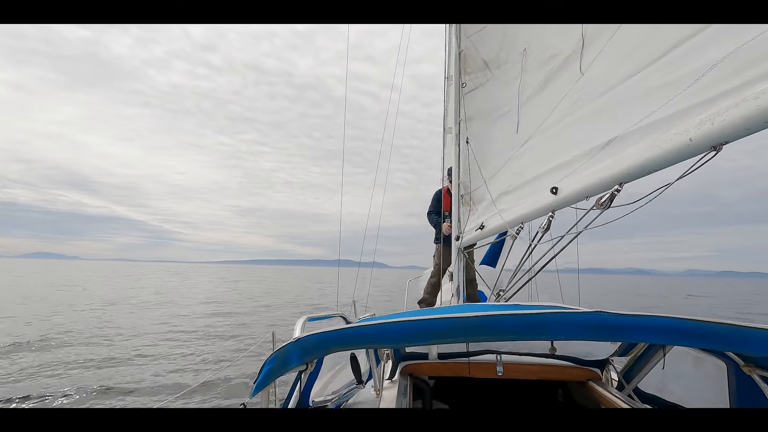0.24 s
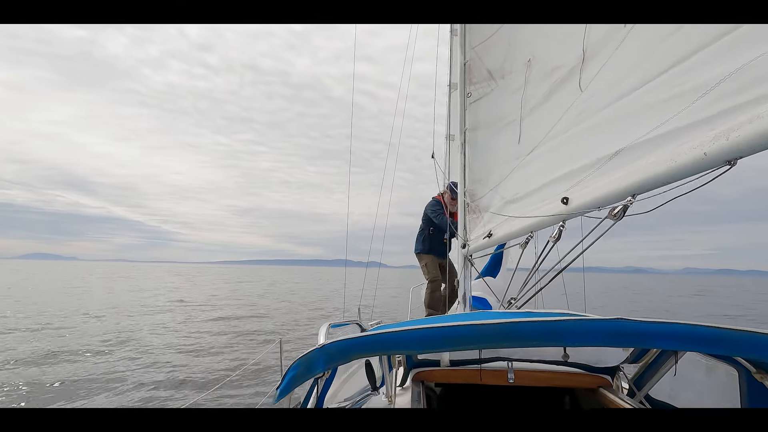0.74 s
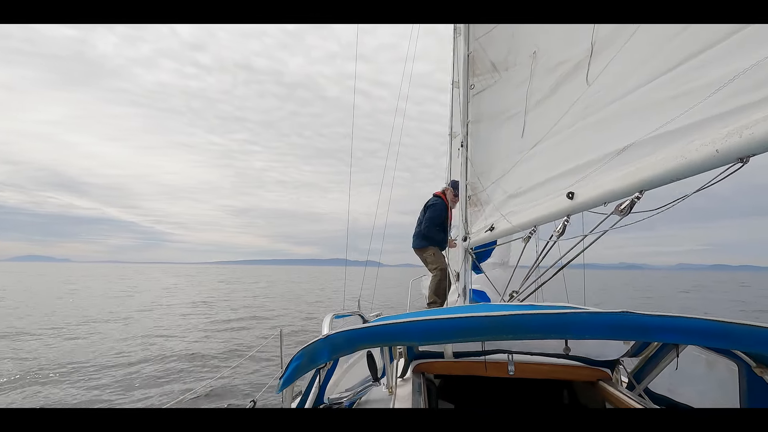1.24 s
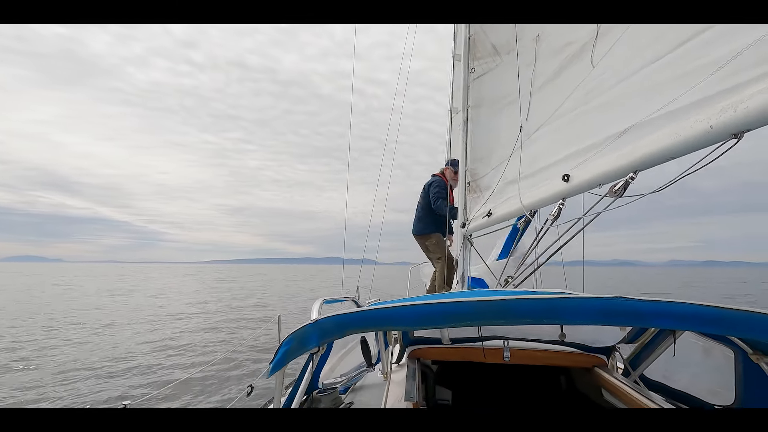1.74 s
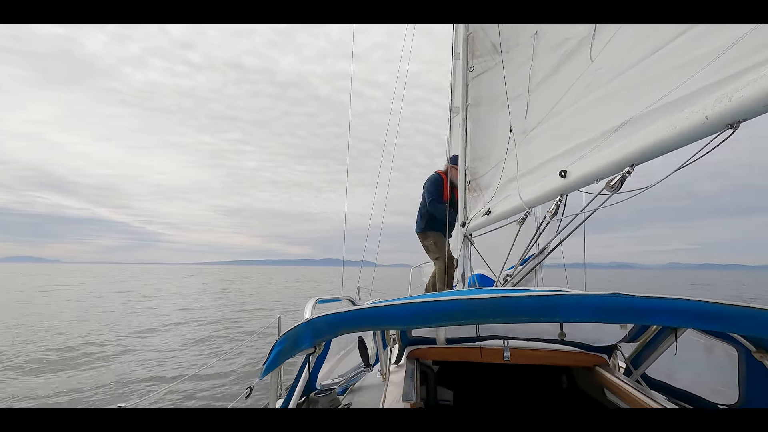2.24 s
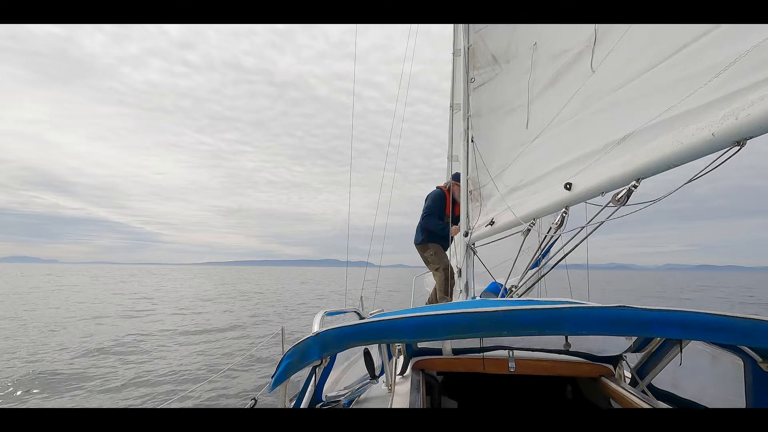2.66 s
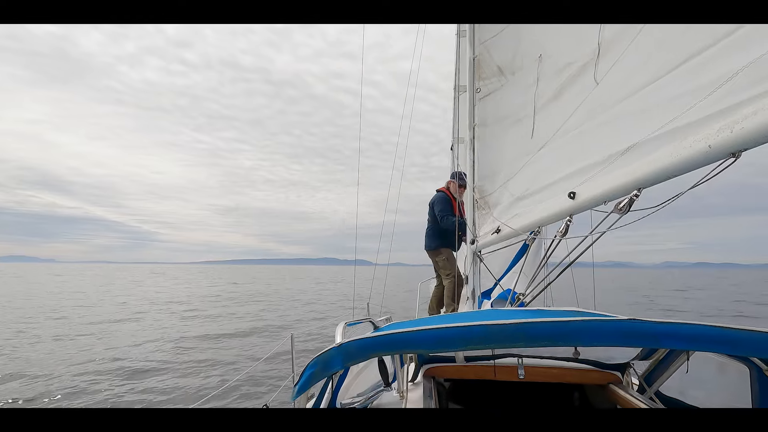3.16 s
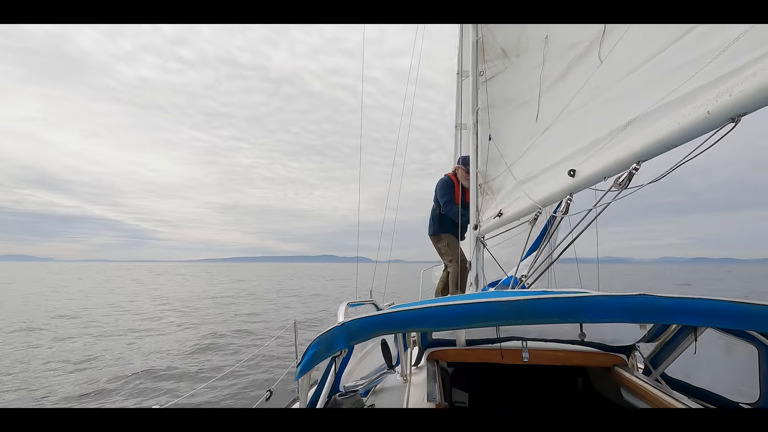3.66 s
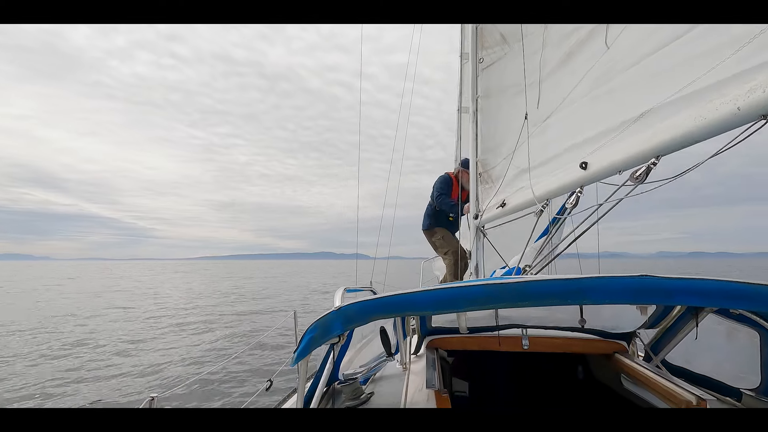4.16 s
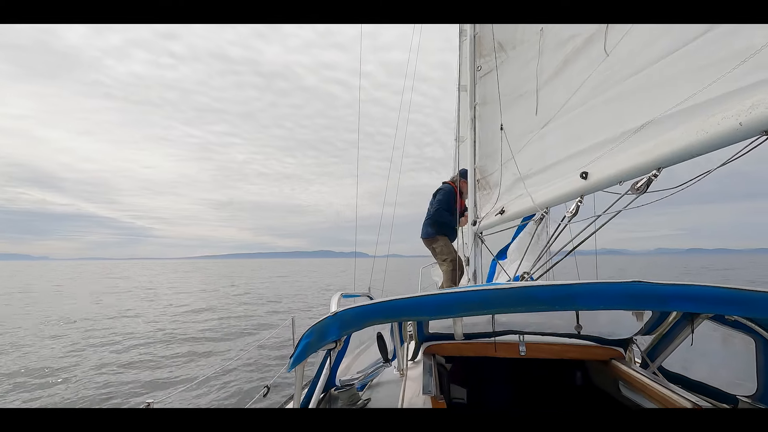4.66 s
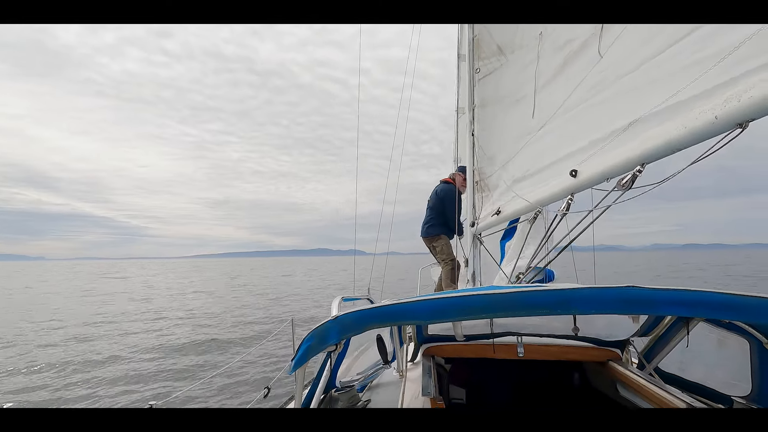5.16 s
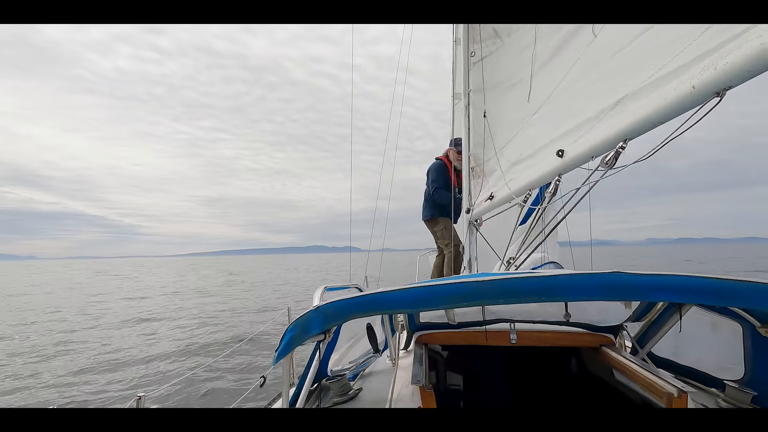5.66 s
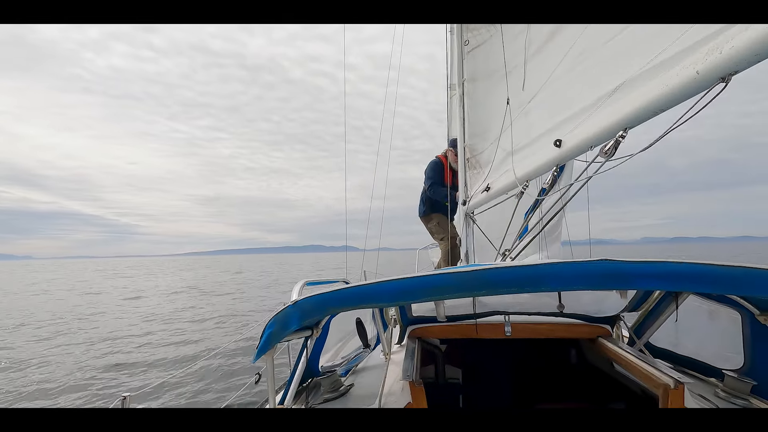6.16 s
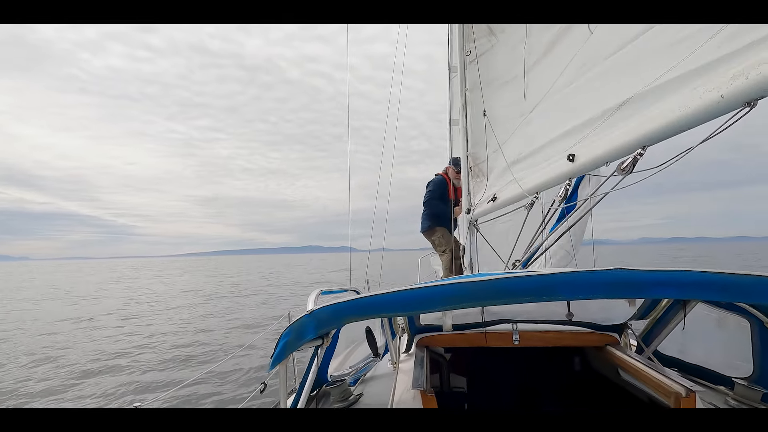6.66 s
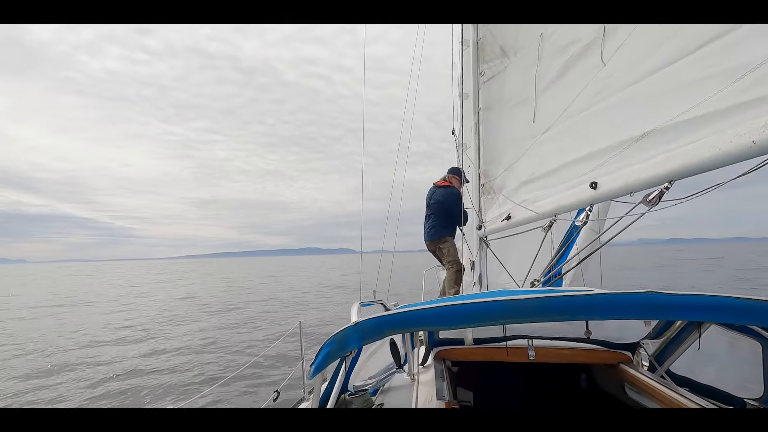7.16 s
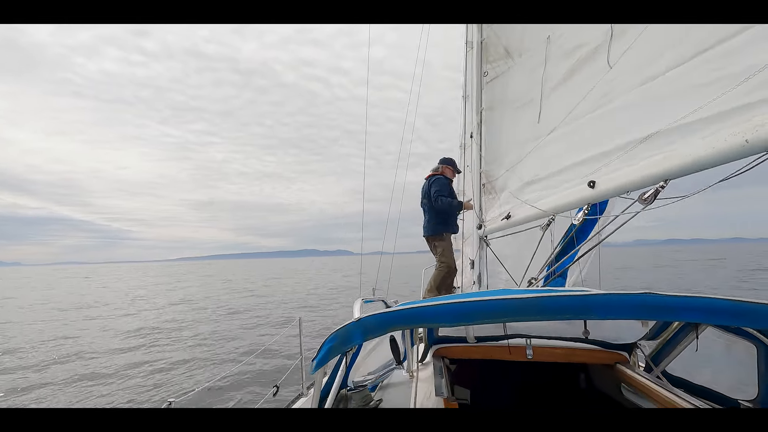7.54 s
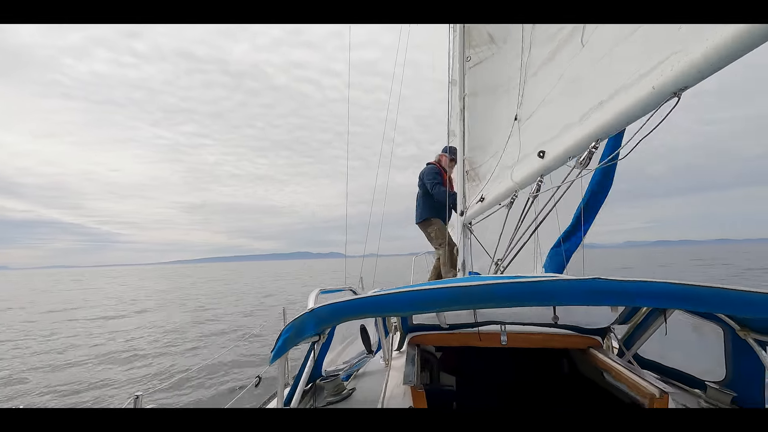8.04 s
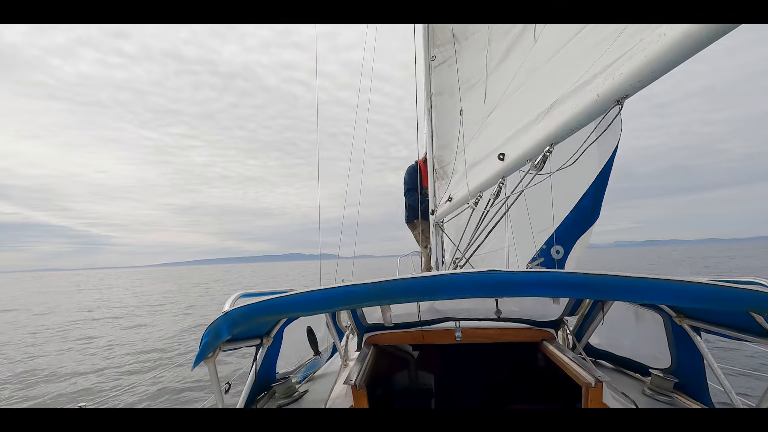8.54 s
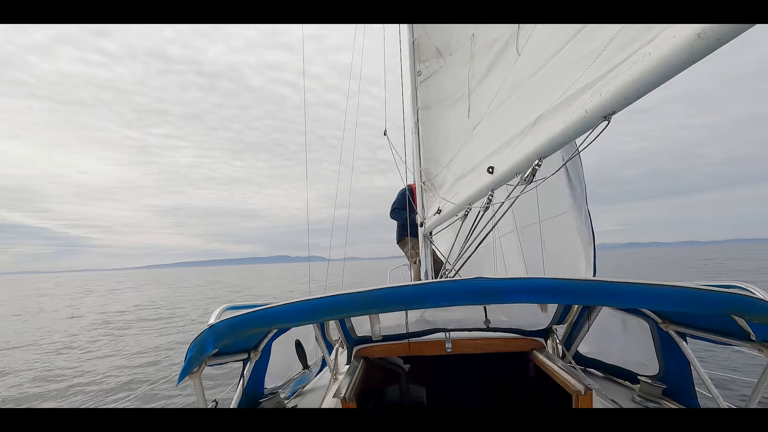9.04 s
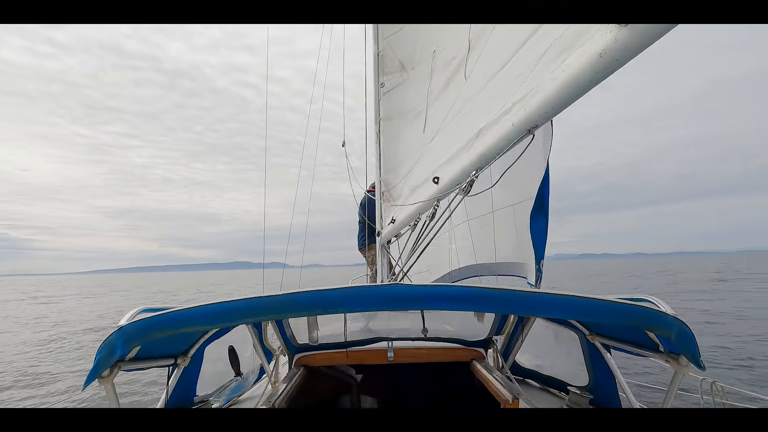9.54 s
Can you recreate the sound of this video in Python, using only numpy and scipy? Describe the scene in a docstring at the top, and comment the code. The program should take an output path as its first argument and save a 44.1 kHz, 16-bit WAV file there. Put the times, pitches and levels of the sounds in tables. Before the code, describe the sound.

On a sailboat deck, a winch at the mast is spun five times. Each haul begins with separate metallic clicks, speeds into a ringing ratchet whirr with rope rubbing over the drum, then stops quickly. Between hauls sailcloth and water rustle softly, small fittings snap and hollow knocks sound. Low wind and water rumble and a faint hull hum continue underneath. Close, dry, nearly centred pickup.

```python
"""A winch at the mast of a sailboat is spun five times: struck drum modes and scattered ticks make the pawl
clicks, slow at first, then blurred into a whirr of filtered grainy noise as a line is hauled in. Between hauls,
cloth and water rustle in clumps of noise grains; struck resonances snap, knock and ping. Filtered noise rumbles
like wind and water under wandering hum tones, and the hull bumps deeply."""
import sys
import numpy as np
from scipy import signal
from scipy.io import wavfile
from scipy.ndimage import uniform_filter1d

SR = 44100
rng = np.random.default_rng(int(sys.argv[2]) if len(sys.argv) > 2 else 0)


def generate_wav(sig):
    """Save sig (samples, or channels by samples) to the path in sys.argv[1] as 16-bit PCM at SR."""
    pcm = np.round(np.clip(np.atleast_2d(sig).T, -1, 1) * 32767).astype(np.int16)
    wavfile.write(sys.argv[1], SR, pcm)


N = 432621

# Levels in the tables are relative dB, trimmed where each layer is mixed.
# One curve a haul. Each row: time in seconds, pawl level in dB, rope-over-drum level in dB, gear whirr in dB.
HAUL_CURVES = [
    [(0.89, -53, -43, -47.5), (1.004, -43, -38, -41), (1.096, -40, -31, -36.5), (1.358, -40, -33, -35),
     (1.442, -44, -34, -37), (1.52, -45, -29, -36), (1.608, -53, -39.5, -46.5), (1.68, -93, -46.5, -68),
     (1.7, -83, -43, -62)],
    [(2.64, -50, -39.5, -45.5), (2.676, -45.5, -39.5, -40), (2.822, -40, -33.5, -34.5),
     (2.968, -40, -34, -32.5), (3.018, -39, -32.5, -34.5), (3.238, -57, -42, -48.5), (3.26, -73, -44, -52),
     (3.278, -73.5, -62, -51), (3.36, -80, -50, -67)],
    [(4.18, -52, -47, -46), (4.222, -51, -45, -43.5), (4.308, -44, -36.5, -38), (4.574, -43, -37, -38),
     (4.584, -43, -33.5, -41), (4.678, -40, -33, -35.5), (5.064, -39, -33, -30.5), (5.19, -46, -36, -38.5),
     (5.28, -74.5, -44, -60)],
    [(6.44, -47.5, -42, -44), (6.632, -42, -34.5, -33), (6.752, -39, -31.5, -32), (7.086, -39, -31, -31),
     (7.19, -40, -35.5, -34.5), (7.244, -43.5, -35.5, -39), (7.338, -54, -41.5, -49),
     (7.378, -60, -61, -54), (7.42, -54, -49, -65)],
    [(8.95, -52.5, -38.5, -49), (8.994, -45.5, -37.5, -38), (9.188, -41, -31, -32.5),
     (9.256, -36, -26.5, -31), (9.274, -39, -30.5, -28.5), (9.578, -41, -31.5, -32),
     (9.63, -45.5, -35, -39.5), (9.662, -48, -40.5, -38), (9.76, -67.5, -36, -58)],
]
# Ringing of the drum, one curve a haul. Each row: time in seconds, main ring in dB, lowest ring in dB.
RING_CURVES = [
    [(0.89, -57, -61), (0.93, -44, -57), (1.096, -44, -37), (1.19, -43, -41), (1.21, -39, -47),
     (1.238, -45, -34.5), (1.282, -36.5, -43), (1.322, -52, -32), (1.348, -38, -31), (1.396, -39.5, -52),
     (1.568, -49, -49), (1.64, -65, -65), (1.68, -91, -85)],
    [(2.64, -47, -51), (2.656, -45, -53), (2.734, -45, -48), (2.764, -48, -54), (2.816, -45, -44),
     (2.858, -53, -37), (2.886, -48, -41), (2.998, -51, -39), (3.018, -49, -54), (3.136, -41.5, -49),
     (3.222, -60, -60), (3.254, -70, -56), (3.3, -77, -69)],
    [(4.18, -51, -59), (4.198, -51, -53), (4.308, -48, -58), (4.368, -41.5, -46), (4.526, -60, -42),
     (4.598, -48, -55), (4.678, -50, -48), (4.742, -53, -44), (4.788, -40, -44), (4.85, -54, -40),
     (5.09, -48, -40), (5.234, -52, -53), (5.28, -77, -69)],
    [(6.44, -51, -54), (6.706, -46, -44), (6.736, -51, -37), (6.87, -36.5, -33), (6.914, -40, -35),
     (6.958, -52, -32), (6.974, -48, -35), (7.028, -40, -32.5), (7.156, -46, -38), (7.188, -39.5, -44),
     (7.278, -46, -46), (7.318, -60, -58), (7.4, -68, -64)],
    [(8.95, -50, -52), (9.062, -47, -54), (9.116, -41, -43), (9.22, -43, -42), (9.24, -35, -33),
     (9.292, -43, -38), (9.378, -35, -34), (9.418, -41, -37), (9.524, -37, -38), (9.54, -43, -43),
     (9.59, -37, -46), (9.708, -46.5, -53), (9.76, -68, -61)],
]
# Character of each haul. Each row: dark share of the whirr in dB; rope groan over the pawls at start and end
# in dB; drive of the modes that wake under load in dB; drive of the second ring in dB; rope drone over the
# pawls in dB; extra lowest ring of the first and last single clicks in dB; extra main ring of the same in dB.
HAUL_LOADS = [(-7, -43, -2, -16, -8, 7, -3, 1, -4, -4), (-5, -13, -4, -11, 5, -14, 0.5, -5, -3, -8),
              (-4.5, -19, -4.5, -5, 9.5, -5.5, -3, 4, -4.5, -5),
              (-2.5, -8, -5, 1, 9.5, -5.5, 0.5, -8, -6, -10), (-4, -30, 13, 9, -15, -4, 2, -3, -4.5, -3)]
# Slow single pawl clicks as the drum starts and stops. Each row: time in seconds, strength in dB.
SINGLE_CLICKS = [(0.7712, -39), (0.8265, -37.5), (0.8667, -38), (0.8925, -35), (0.9098, -36), (0.925, -34),
                 (0.9452, -34), (0.961, -34), (0.9774, -29), (1.558, -30.5), (1.585, -35), (1.61, -42),
                 (2.51, -36.5), (2.5334, -37), (2.551, -35), (2.5716, -39), (2.599, -37), (2.6174, -35.5),
                 (2.634, -33), (2.652, -32), (2.671, -31), (2.687, -28.5), (3.165, -31), (3.186, -34.5),
                 (3.215, -37), (3.233, -49), (3.255, -46), (4.087, -41), (4.127, -35), (4.152, -37),
                 (4.1768, -35), (4.192, -36), (4.21, -34), (4.222, -38), (4.2363, -37), (4.249, -36),
                 (4.261, -33), (4.272, -37), (4.282, -30.5), (4.2926, -33), (4.3021, -35), (4.3111, -34),
                 (6.358, -37.5), (6.381, -35.5), (6.411, -35.5), (6.431, -31), (6.451, -37), (6.4622, -31),
                 (6.476, -35), (6.486, -30), (6.499, -34), (6.509, -30), (7.308, -34), (7.34, -39),
                 (8.906, -38.5), (8.9196, -43), (8.943, -35.5), (8.958, -34), (8.972, -35), (8.9828, -34),
                 (8.997, -30.5), (9.005, -34)]
# Drive of a single click in dB, one value for each kind of strike, in the order of the drum modes' kinds.
SINGLE_CLICK_DRIVE = [14.2, 20.8, 23.6, 16, 11, 16]
# Modes of the winch drum. Each row: pitch in Hz, nominal width in Hz, level in dB, left over right in dB,
# part that differs between the ears in dB, kind of strike that drives it
# (0 plain, 1 lowest ring, 2 main ring, 3 shrill, 4 under load, 5 second ring).
DRUM_MODES = [(2200, 60, -12, 0, -80, 4), (2445, 50, -2, 0, -80, 4), (2535, 50, -6, 0, -80, 4),
              (2790, 110, -5, 0, -80, 1), (2700, 90, -14, 0, -80, 1), (2865, 120, -13, 0, -80, 1),
              (3140, 55, -11, 0, -80, 4), (3520, 60, -10, 0, -80, 4), (3805, 70, -10, 0, -80, 4),
              (6350, 150, -15, 0, -80, 0), (3010, 60, -9, 0, -80, 5), (3445, 70, -4, 0, -80, 0),
              (3940, 60, -13, 0, -80, 0), (4745, 90, -5, 0, -80, 2), (4772, 70, -3, 0, -80, 2),
              (5480, 45, -10, 0, -80, 0), (5600, 160, -14, 0, -80, 0), (6660, 260, -16, 0, -80, 0),
              (7165, 40, -13, 0, -80, 0), (7960, 50, -18, 0, -80, 3), (9160, 300, -27, 0, -80, 3),
              (10300, 900, -35, 0, -80, 3), (11535, 65, -19, 4, -8, 3), (11805, 80, -17, 4, -7, 3),
              (12210, 80, -25, 4, -4, 3), (12470, 70, -25, 4, -4, 3), (12900, 130, -31, 4, -4, 3)]
# Colour of the bare click. Each row: frequency in Hz, gain in dB.
TICK_COLOUR = [(880, -19), (1500, -35), (2470, -18), (2830, -4), (4430, -9.5), (4700, -9.5), (6680, -5.5),
               (8350, -25), (9770, -24.5), (11000, -31), (11400, -20), (12000, -15), (15400, -60)]
# Colour of the gear whirr. Each row: frequency in Hz, density in dB per Hz.
WHIRR_COLOUR = [(880, -27), (1500, -29.5), (2460, -3), (2840, 1), (3310, -0.5), (4050, -2), (4420, -6),
                (4690, -5), (6690, -10.5), (8500, -22.5), (11000, -45), (18700, -120)]
# Colour of the rope rushing over the drum. Each row: frequency in Hz, density in dB per Hz.
RUSH_COLOUR = [(140, -54.5), (240, -2), (364, -3), (510, 5.5), (561, -3), (606, -2.5), (727, -10.5),
               (835, -5.5), (1650, -18), (1900, -22.5), (2470, -24), (4180, -120)]
# One curve a rest between hauls. Each row: time in seconds, dull rustle in dB, bright rustle in dB.
REST_CURVES = [
    [(0.0, -47, -53), (0.44, -46, -56), (0.678, -46, -51.5), (0.85, -49, -60)],
    [(1.7, -53, -61), (1.89, -43, -52), (2.178, -41.5, -55), (2.358, -41, -52), (2.5, -47, -60)],
    [(3.35, -47, -54), (3.452, -50, -63), (3.718, -51.5, -56.5), (3.922, -45, -54), (4.08, -39, -54)],
    [(5.3, -48, -56), (5.568, -42, -56.5), (5.692, -41.5, -50.5), (6.168, -46.5, -54), (6.34, -41, -65)],
    [(7.43, -44, -49.5), (7.63, -40.5, -53.5), (7.99, -37.5, -42.5), (8.62, -46, -55), (8.9, -51, -49.5)],
    [(9.72, -41, -40), (9.81, -47, -46)],
]
# Colour of the dull rustle. Each row: frequency in Hz, density in dB per Hz.
DULL_COLOUR = [(150, -35), (250, 6.5), (263, -14), (292, -5), (333, 1), (390, 1), (963, -8.5), (2000, -22),
               (2600, -24.5), (4400, -120)]
# Colour of the bright rustle. Each row: frequency in Hz, density in dB per Hz.
BRIGHT_COLOUR = [(880, -26), (1500, -11), (1850, -5.5), (2890, -0.5), (3820, -5), (4680, -10.5),
                 (6610, -14), (7870, -25), (12100, -33.5), (15000, -41)]
# Dull knocks of gear and water on the deck. Each row: time in seconds, peak in dB, pitch in Hz,
# noise decay time (T60) in seconds.
DECK_KNOCKS = [(0.041, -36, 725, 0.043), (0.21, -23.5, 590, 0.056), (0.271, -36, 686, 0.054),
               (0.331, -37, 1040, 0.032), (0.454, -25, 970, 0.26), (0.557, -27, 613, 0.055),
               (0.585, -31, 700, 0.08), (0.658, -33, 850, 0.053), (0.679, -28, 810, 0.036),
               (0.715, -36, 799, 0.053), (0.763, -32, 600, 0.065), (0.89, -31, 634, 0.065),
               (1.2, -19, 470, 0.073), (1.347, -25, 470, 0.077), (1.503, -21, 450, 0.07),
               (1.824, -31.5, 760, 0.04), (1.954, -34, 550, 0.04), (1.973, -18.5, 930, 0.037),
               (2.046, -23, 605, 0.052), (2.16, -33, 850, 0.04), (2.198, -26, 700, 0.05),
               (2.287, -24.5, 800, 0.02), (2.309, -36, 900, 0.04), (2.36, -31, 730, 0.05),
               (2.388, -36, 810, 0.04), (2.084, -33, 970, 0.071), (2.281, -33, 626, 0.08),
               (3.255, -24, 660, 0.06), (3.316, -37, 774, 0.065), (3.401, -33, 650, 0.081),
               (3.459, -30, 584, 0.14), (3.705, -29, 796, 0.065), (3.719, -34, 900, 0.04),
               (3.739, -27, 900, 0.04), (3.749, -31, 800, 0.03), (3.956, -32, 500, 0.1),
               (3.968, -30, 800, 0.05), (4.166, -32, 834, 0.065), (4.438, -22, 300, 0.045),
               (5.511, -38, 910, 0.05), (5.54, -33, 1020, 0.075), (5.62, -38, 650, 0.05),
               (5.658, -28, 1120, 0.075), (5.693, -28, 600, 0.04), (5.708, -23, 1460, 0.026),
               (5.72, -32, 1100, 0.061), (5.79, -31, 610, 0.06), (5.805, -34, 597, 0.04),
               (5.851, -31, 860, 0.045), (5.862, -24, 900, 0.03), (5.868, -19, 520, 0.11),
               (5.909, -32, 580, 0.04), (6.062, -39, 1090, 0.058), (6.128, -31, 680, 0.04),
               (6.158, -23.5, 880, 0.094), (6.181, -33, 970, 0.04), (6.258, -29, 686, 0.06),
               (6.371, -22, 655, 0.33), (6.578, -26, 1070, 0.14), (6.672, -21, 719, 0.091),
               (7.029, -20, 800, 0.036), (7.0364, -11, 480, 0.042), (7.46, -24, 920, 0.071),
               (7.481, -23, 900, 0.026), (7.488, -28, 1100, 0.03), (7.518, -20.5, 500, 0.083),
               (7.552, -24, 800, 0.1), (7.577, -26, 600, 0.04), (7.609, -23, 1020, 0.06),
               (7.62, -36, 1200, 0.03), (7.631, -31, 1200, 0.03), (7.731, -32, 1140, 0.05),
               (7.758, -26, 700, 0.086), (7.774, -32, 750, 0.08), (7.9293, -13, 900, 0.04),
               (8.022, -22, 640, 0.076), (8.221, -26, 705, 0.086), (8.569, -25, 625, 0.041),
               (8.772, -36, 596, 0.044), (9.338, -20, 634, 0.059), (9.687, -17, 684, 0.13),
               (9.793, -15, 1350, 0.053)]
# Snaps of cloth and small fittings. Each row: time in seconds, peak in dB, centre in Hz,
# crisp edge over body in dB, noise decay time (T60) in seconds.
CLOTH_SNAPS = [(0.039, -42, 2670, -5, 0.042), (0.152, -37.5, 4730, -2, 0.13),
               (0.1737, -36, 2530, -24, 0.14), (0.21, -37, 2640, -13, 0.14), (0.269, -45, 2350, -20, 0.07),
               (0.333, -46, 1900, -14, 0.03), (0.375, -47, 2350, 0, 0.048), (0.581, -31, 3300, -1, 0.038),
               (0.617, -39.5, 3180, 17, 0.074), (0.6579, -52, 2850, -13, 0.07),
               (0.682, -39.5, 2320, 7, 0.1), (0.7482, -50, 4770, -15, 0.07), (1.821, -39, 2000, -14, 0.069),
               (1.929, -38.5, 2300, -13, 0.05), (2.198, -40, 2600, -18, 0.05),
               (2.424, -45, 2800, -15, 0.02), (2.046, -37, 2600, -7, 0.038), (2.086, -44, 2030, -24, 0.047),
               (2.366, -40, 2900, -23, 0.07), (2.388, -40, 2000, -18, 0.033),
               (3.704, -38.5, 1990, -9.5, 0.28), (3.836, -41.5, 3500, -30, 0.11),
               (3.912, -49, 3600, -1, 0.095), (3.9677, -45, 1920, -13, 0.064),
               (4.032, -52, 2920, -21, 0.07), (5.4914, -46, 1980, 2, 0.057),
               (5.516, -42.5, 2100, -19, 0.082), (5.542, -43, 2100, -13, 0.07),
               (5.6074, -51, 2090, -10, 0.07), (5.667, -39.5, 2410, -23, 0.098),
               (5.7094, -34, 1930, -10, 0.09), (5.557, -45, 3000, -6, 0.03), (5.79, -40.5, 2300, -14, 0.08),
               (5.861, -32.5, 2600, -18, 0.14), (6.1602, -38.5, 2040, -12, 0.086),
               (6.2227, -45, 2010, -17, 0.082), (6.259, -37.5, 1940, -31, 0.094),
               (7.3991, -39.5, 4000, -15, 0.081), (7.46, -37, 1900, -16, 0.03),
               (7.488, -38.5, 2140, -9, 0.07), (7.545, -38, 1940, -9.5, 0.14),
               (7.609, -47, 2020, -22, 0.14), (7.62, -43, 2500, -14, 0.02), (7.631, -40, 2600, -16, 0.02),
               (7.707, -44, 1900, -6, 0.03), (7.731, -41, 2800, -14, 0.03), (7.803, -40, 3080, -15, 0.094),
               (7.891, -34.5, 3470, -24, 0.16), (7.9287, -32.5, 2190, -4, 0.13),
               (7.964, -35, 1700, -14, 0.03), (8.004, -30, 2690, 5, 0.036), (8.0195, -32, 2830, -15, 0.064),
               (8.0295, -26.5, 2920, -11, 0.082), (8.0473, -40, 2300, -15, 0.091),
               (8.079, -37, 2120, 1, 0.096), (8.152, -40, 2680, -15, 0.051),
               (8.1608, -35, 2710, -10, 0.062), (8.236, -36, 2170, -10, 0.054),
               (8.4906, -45.5, 1950, 1, 0.077), (8.579, -43, 3390, -8, 0.13),
               (8.746, -41, 2300, 1.5, 0.058), (8.772, -36, 2410, -1, 0.042), (8.8354, -43, 2780, 1, 0.095),
               (9.7922, -25.5, 2220, -14, 0.065)]
# Pings of small fittings. Each row: time in seconds, peak in dB, pitch in Hz, noise decay (T60) in seconds.
FITTING_PINGS = [(0.186, -39, 2400, 0.05), (0.214, -40, 2600, 0.074), (3.705, -39, 2000, 0.06),
                 (3.733, -42, 2500, 0.05), (4.034, -42, 3120, 0.036), (0.1525, -45, 4780, 0.046),
                 (8.8338, -46, 6780, 0.17), (8.837, -55, 8500, 0.055)]
# Deep bumps through the hull. Each row: time in seconds, peak in dB, pitch in Hz.
HULL_BUMPS = [(1.929, -20, 250), (4.33, -16, 217), (5.069, -19.5, 152), (5.851, -21, 207),
              (6.912, -20.5, 177), (8.885, -24, 130), (9.236, -30, 111), (9.407, -14, 62.4),
              (9.69, -16, 150)]
# Colour of the wind and water rumble. Each row: frequency in Hz, density in dB per Hz.
RUMBLE_COLOUR = [(8.8, -25), (15, -1), (36, 4), (60, 2.5), (91, -5), (124, -0.5), (173, -1), (204, -4.5),
                 (264, -9.5), (320, -11.5), (420, -43), (700, -120)]
# Swelling of the rumble. Each row: time in seconds, level in dB.
RUMBLE_CURVE = [(0.0, -39.5), (0.38, -36), (0.52, -36.5), (1.58, -35.5), (2.84, -33), (3.33, -35.5),
                (3.69, -34.5), (4.23, -35.5), (4.45, -29), (4.81, -35.5), (5.54, -35), (5.76, -36),
                (5.93, -36), (6.56, -38), (7.13, -30), (7.79, -33), (8.22, -32.5), (8.8, -33),
                (9.67, -30.5), (9.81, -25)]
# Hum tones in the hull. Each row: pitch in Hz, level in dB, rms pitch wander in Hz, rms swell in dB.
HUM_TONES = [(207.1, -39.5, 0.92, 2.5), (238, -44.5, 0.49, 0.6), (127.5, -47.5, 1.16, 2.5),
             (137, -50, 0.96, 2), (113.7, -51, 1.27, 2.5), (195.4, -52, 0.83, 4), (45.6, -43, 0.93, 3),
             (68.7, -49, 1.5, 3.5), (224, -54, 0.99, 6), (251.8, -54.5, 1.22, 2)]
# How far the two channels differ. Each row: frequency in Hz, gain in dB.
CHANNEL_DIFFERENCE = [(100, -68), (300, -63.5), (1000, -50.5), (2500, -60), (5000, -40), (8000, -25),
                      (10600, -19), (11300, -15.5), (13000, -2), (13600, -2), (15500, -6)]

FULL_SPIN_DB, STANDS_DB = -39, -57  # pawl level at 150 teeth a second; below the second the drum stands still
MAIN_DRIVE_DB, LOW_DRIVE_DB = 5.5, 6.5  # strike strength over ring level
RING_WAVER_DB, RING_WAVER_S = 1.7, 0.023
MODE_WAVER_DB, MODE_WAVER_S = 4.5, 0.077  # each plain mode comes and goes
TICK_T60_S, TICK_DB, ECHO_T60_S, ECHO_DB = 0.018, -11, 0.09, -21  # a tooth: short snap, then echoes
DRONE_HZ, DRONE_WIDTH_HZ = 472, 96
GRAIN_RISE_S = 0.0011
KNOCK_HARDNESS, HARDER_PER_DB = 17, 0.25  # loud knocks are more blow, less noise
KNOCK_SHARPNESS, WIDER_PER_DB = 1.74, 0.45  # sharpness = pitch over width; loud knocks are wider
BUMP_T60_S = 0.24
SNAP_TOP_HZ = 8050  # distance dulls the snaps
EDGE_HZ = 15300  # top of the heard band
SOUND_LENGTH = 4000  # longest single snap, knock, ping or bump, in samples


def gain_of(db):
    """Decibels to a factor."""
    return 10 ** (np.asarray(db) / 20)


def evened(x):
    """Scales to rms 1."""
    return x / np.sqrt(np.mean(x ** 2) + 1e-20)


def read(points, hz):
    """Reads a spectrum table at the given frequencies, along a log axis."""
    f, value = np.transpose(points)
    return np.interp(np.log(hz + 1), np.log(f + 1), value)


def follow(tables, column, fade=0.17):
    """A dB column of several tables as one curve that sinks 20 dB per fade time (s) outside them."""
    t, out = np.arange(N) / SR, np.full(N, -120.)
    for rows in tables:
        rows = np.array(rows, dtype=float)
        outside = np.maximum(np.maximum(rows[0, 0] - t, t - rows[-1, 0]), 0)
        curve = np.interp(t, rows[:, 0], rows[:, column])
        out = np.maximum(out, curve - 20 * outside / fade)
    return out


def load(first, last):
    """A haul's own value, gliding from one column at its start to another at its end."""
    edges = [(rows[0][0], rows[-1][0]) for rows in HAUL_CURVES]
    values = np.array(HAUL_LOADS)[:, [first, last]]
    return np.interp(np.arange(N) / SR, np.ravel(edges), np.ravel(values))


def smooth_noise(steps):
    """Slow random drift of rms 1: noise averaged twice over a span in samples."""
    once = uniform_filter1d(rng.standard_normal(N), size=steps)
    return evened(uniform_filter1d(once, size=steps))


def waver(depth_db, span_s):
    """Slow chance in dB, with the depth as its rms."""
    return depth_db * smooth_noise(max(round(span_s * SR), 1))


def colour(x, points):
    """Causal minimum-phase filter with the gain of a spectrum table."""
    gain_db = read(points, abs(np.fft.fftfreq(4096, 1 / SR))).clip(-100)
    log_gain = gain_db * np.log(10) / 20
    phase = signal.hilbert(log_gain).imag
    taps = np.fft.ifft(np.exp(log_gain - 1j * phase)).real[:2048]
    return signal.oaconvolve(x, taps)[:N]


def ring(x, hz, width):
    """A damped two-pole mode: the wider in Hz, the faster its ringing dies."""
    r, w = np.exp(-np.pi * width / SR), 2 * np.pi * hz / SR
    return signal.lfilter([np.sin(w)], [1, -2 * r * np.cos(w), r * r], x)


def steep(x, hz, width):
    """A mode passed twice: gain near 1 at its peak, soft onset, dark flanks."""
    level = (2 - 2 * np.exp(-np.pi * width / SR)) ** 2
    return ring(ring(x, hz, width), hz, width) * level


def grainy(per_s, spread_db, t60):
    """Noise whose loudness jumps with random grains and dies back to a steady bed."""
    size = gain_of(spread_db * np.minimum(rng.exponential(1, N), 4))
    grains = size * (rng.random(N) < per_s / SR)
    decay = gain_of(-60 / (t60 * SR)) ** 2
    power = signal.lfilter([1], [1, -decay], grains ** 2)
    power = abs(uniform_filter1d(power, size=round(GRAIN_RISE_S * SR)))
    return rng.standard_normal(N) * np.sqrt(power + 3.1)  # 3.1 is the steady bed


def puff(noise, t60, hardness):
    """A one-sample blow on top of dying noise."""
    t = np.arange(len(noise)) / SR
    rise = 1 - np.exp(-t / 0.00019)
    return noise * gain_of(-60 * t / t60) * rise + hardness * (t == 0)


def puff_noise(table):
    """Fresh noise for each row of a table."""
    return rng.standard_normal((len(table), SOUND_LENGTH))


def place(table, sounds, lift_db):
    """Lays each sound at its time with its peak level, plus a lift shared by all."""
    out = np.zeros(N + SOUND_LENGTH)
    for row, sound in zip(table, sounds):
        start = round(row[0] * SR)
        out[start:start + SOUND_LENGTH] += gain_of(row[1] + lift_db) * sound / abs(sound).max()
    return out[:N]


def hull():
    """Rumble of wind and water, and steady hum tones that wander a little in pitch and strength."""
    rumble = evened(colour(rng.standard_normal(N), RUMBLE_COLOUR))
    out = rumble * gain_of(follow([RUMBLE_CURVE], column=1) - 1.46 + waver(1.2, 0.11))
    for hz, db, wander_hz, swell_db in HUM_TONES:
        drift, swell = smooth_noise(5000), smooth_noise(5000)
        phase = 2 * np.pi * np.cumsum(hz + wander_hz * drift) / SR
        out += np.sqrt(2) * gain_of(db + swell_db * swell) * np.sin(phase)
    return out


def rustle():
    """Sailcloth and lapping water: clumps of short noise grains, dull and bright."""
    dull = evened(colour(grainy(300, 4.25, 0.1), DULL_COLOUR))
    bright = evened(colour(grainy(360, 4.0, 0.03), BRIGHT_COLOUR))
    dull_db = follow(REST_CURVES, column=1, fade=0.95) + 0.5
    bright_db = follow(REST_CURVES, column=2, fade=0.93) - 6.5
    return dull * gain_of(dull_db) + bright * gain_of(bright_db)


def snaps():
    """Each snap of cloth or fittings excites a resonant body and a wide crisp edge."""
    sounds = []
    for (_, _, hz, edge_db, t60), noise in zip(CLOTH_SNAPS, puff_noise(CLOTH_SNAPS)):
        blow = puff(noise, t60, hardness=5.2)
        body, edge = steep(blow, hz, hz / 1.35), steep(blow, 4870, 3500)
        sounds.append(body / abs(body).max() + gain_of(edge_db) * edge / abs(edge).max())
    dulling = signal.butter(2, SNAP_TOP_HZ, fs=SR)
    return signal.lfilter(*dulling, place(CLOTH_SNAPS, sounds, lift_db=2.5))


def knocks():
    """Each knock thumps a hollow part at its own pitch, broader and harder when loud."""
    sounds = []
    for (_, db, hz, t60), noise in zip(DECK_KNOCKS, puff_noise(DECK_KNOCKS)):
        hardness = KNOCK_HARDNESS * gain_of(HARDER_PER_DB * (db + 25.5))
        sharpness = max(KNOCK_SHARPNESS - WIDER_PER_DB * (db + 29.5), .7)
        sounds.append(steep(puff(noise, t60, hardness), hz, hz / sharpness))
    return place(DECK_KNOCKS, sounds, lift_db=0.4)


def pings():
    """Small fittings ping: a blow with dying noise through a narrow mode."""
    sounds = [steep(puff(noise, t60, hardness=5.5), hz, 250)
              for (_, _, hz, t60), noise in zip(FITTING_PINGS, puff_noise(FITTING_PINGS))]
    return place(FITTING_PINGS, sounds, lift_db=1.5)


def pawl_strikes():
    """Teeth pass faster as the drum gains speed; gives one train of blows for each kind of strike."""
    level_db = follow(HAUL_CURVES, column=1, fade=.01)
    per_s = np.clip(150 * gain_of(.75 * (level_db - FULL_SPIN_DB)), 45, 260)  # louder = faster
    wobble = evened(uniform_filter1d(rng.standard_normal(N), size=300))
    passed = np.floor(np.cumsum(per_s * (1 + .18 * wobble).clip(.1)) / SR)
    teeth = np.diff(passed, prepend=0) * (level_db > STANDS_DB)
    # dense teeth strike more weakly, so the tooth rate does not change the level
    blows = teeth * gain_of(level_db + 1.53 * rng.standard_normal(N)) * np.sqrt(SR / per_s)

    low_db = (follow(RING_CURVES, column=2, fade=.01) - level_db + LOW_DRIVE_DB).clip(-30, 20)
    low_db += waver(RING_WAVER_DB, RING_WAVER_S)
    main_db = (follow(RING_CURVES, column=1, fade=.01) - level_db + MAIN_DRIVE_DB).clip(-30, 20)
    main_db += waver(RING_WAVER_DB, RING_WAVER_S)
    shrill_db = 0.21 * (level_db + 64.0)  # the shrill modes wake up at speed
    second_db = load(4, 4) + waver(RING_WAVER_DB, RING_WAVER_S)
    strikes = blows * gain_of([np.zeros(N), low_db, main_db, shrill_db, load(3, 3), second_db])

    singles = [round(s * SR) for s, _ in SINGLE_CLICKS]
    for at in singles:
        strikes[:, at - 650:at + 450] = 0  # clear the steady train around each single click
    for at, (_, db) in zip(singles, SINGLE_CLICKS):
        strikes[:, at] = gain_of(db + np.array(SINGLE_CLICK_DRIVE))
    strikes[1:3, singles] *= gain_of([load(6, 7)[singles], load(8, 9)[singles]])

    # loose parts keep shaking after a tooth
    rattle = rng.standard_normal(1500) * gain_of(-60 * np.arange(1500) / SR / 0.1)
    strikes[3] = signal.oaconvolve(strikes[3], rattle / np.linalg.norm(rattle))[:N]
    return strikes


def drum_ring(strikes):
    """Each kind of strike rings its own modes of the drum; the highest differ between the ears."""
    signs = rng.choice([-1., 1.], (2, N))  # each tooth meets the ringing drum at a chance phase
    out = np.zeros((2, N))
    for hz, width, db, pan_db, unlike_db, kind in DRUM_MODES:
        waver_db = waver(MODE_WAVER_DB, MODE_WAVER_S) if kind == 0 else 0
        both, apart = steep(strikes[kind] * signs * gain_of(waver_db), hz, 0.7 * width)
        panned = both * gain_of([[pan_db / 2], [-pan_db / 2]])
        ears = panned + gain_of(unlike_db) * apart * [[1], [-1]]
        tilt_db = .5 * np.log2(hz / 4000)
        out += gain_of(db + tilt_db + 23.0) * ears
    return out


def click_scatter(blows):
    """The bare click of each tooth scatters off mast and deck as a short snap with fading echoes."""
    after = np.arange(3000) / SR
    fading = gain_of(-60 * after / TICK_T60_S + TICK_DB) + gain_of(-60 * after / ECHO_T60_S + ECHO_DB)
    scatter = rng.standard_normal((4, 3000)) * fading
    path = rng.integers(0, 4, N)  # the drum turns, so the echoes differ from tooth to tooth
    echoed = sum(signal.oaconvolve(blows * (path == k), taps)[:N] for k, taps in enumerate(scatter))
    return gain_of(3.5) * colour(echoed, TICK_COLOUR)


def pawls():
    """Each pawl click rings the drum and scatters off mast and deck."""
    strikes = pawl_strikes()
    return drum_ring(strikes) + click_scatter(strikes[0])


def gears():
    """Bearings and gears whirr: grainy noise with a dark share set for each haul."""
    grind = grainy(400, 2.8, .02)
    dark = evened(steep(grind, 2100, 600))
    whirr = evened(colour(grind, WHIRR_COLOUR)) + gain_of(load(0, 0)) * dark
    return whirr * gain_of(follow(HAUL_CURVES, column=3) - 2.5)


def rope():
    """The rope rubs over the turning drum: one grainy noise heard as rush, drone and groan."""
    rub = grainy(300, 1.0, 0.1)
    pawl_db = follow(HAUL_CURVES, column=1)
    rush = evened(colour(rub, RUSH_COLOUR))
    drone = evened(steep(rub, DRONE_HZ, DRONE_WIDTH_HZ))
    groan = evened(steep(rub, 1150, 400))
    out = rush * gain_of(follow(HAUL_CURVES, column=2) + waver(1.3, 0.063))
    out += drone * gain_of(pawl_db + load(5, 5) + waver(4.0, 0.04))
    return out + groan * gain_of(pawl_db + load(1, 2))


def bumps():
    """Deep bumps through the hull: hard blows on broad, low modes."""
    sounds = [steep(puff(noise, BUMP_T60_S, hardness=60.0), hz, hz / 1.96)
              for (_, _, hz), noise in zip(HULL_BUMPS, puff_noise(HULL_BUMPS))]
    return place(HULL_BUMPS, sounds, lift_db=-3.0)


def scene():
    """All but the drum's highest modes sit in the middle."""
    deck_sounds = rustle() + snaps() + knocks() + pings()
    winch = pawls() + gears() + rope()
    return hull() + deck_sounds + winch + bumps()


def record(dry):
    """The two channels differ a little, mostly in the treble, each with its faint hiss; then the band limit."""
    taps = rng.standard_normal(1500) * gain_of(-40 * np.arange(1500) / 1500)
    smeared = signal.oaconvolve(dry.mean(0), taps / np.linalg.norm(taps))
    apart = colour(smeared, CHANNEL_DIFFERENCE)
    hiss = gain_of(-110) * rng.standard_normal((2, N))
    channels = dry + apart * [[1], [-1]] + hiss
    band_limit = signal.firwin(511, EDGE_HZ, window=("kaiser", 9), fs=SR)
    return signal.oaconvolve(channels, band_limit[None], "same")


dry = scene()
out = record(dry)
generate_wav(out)
```